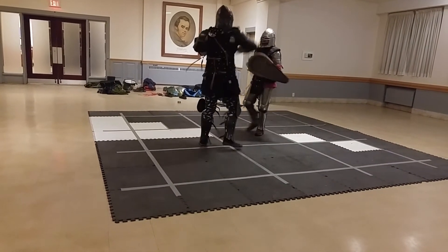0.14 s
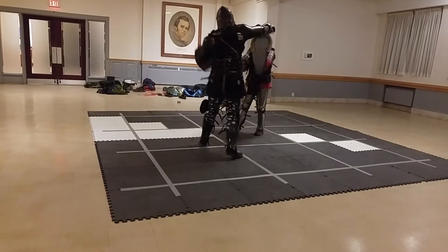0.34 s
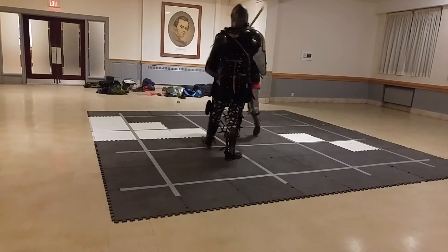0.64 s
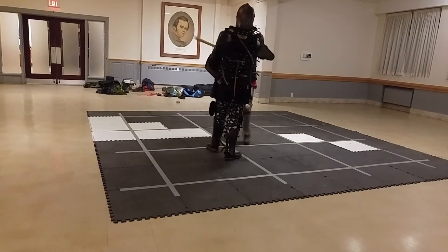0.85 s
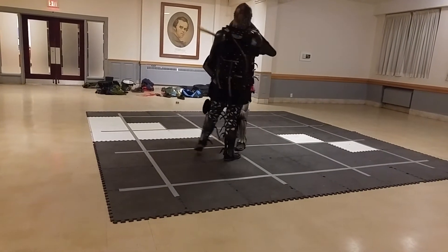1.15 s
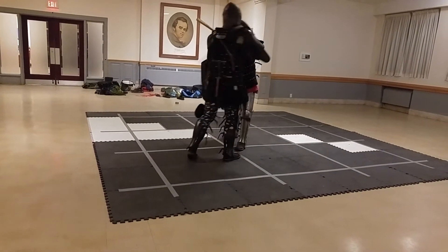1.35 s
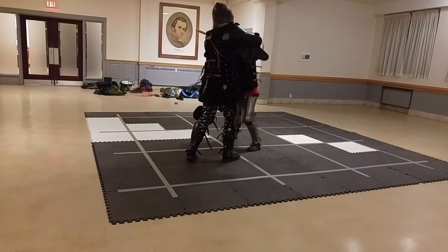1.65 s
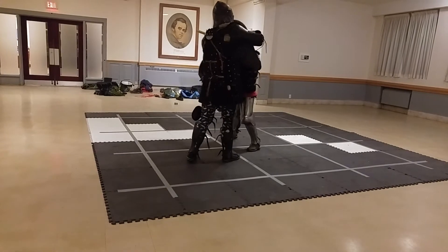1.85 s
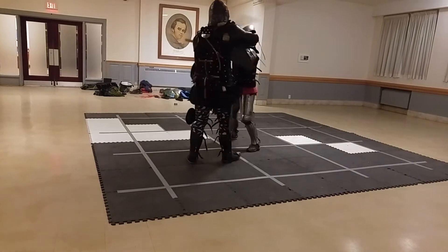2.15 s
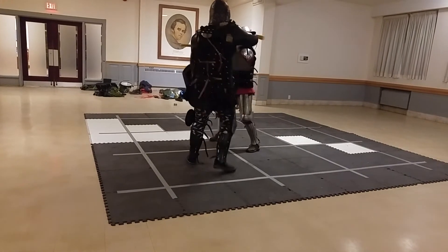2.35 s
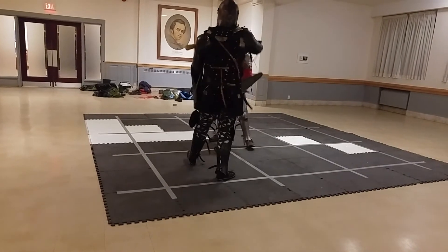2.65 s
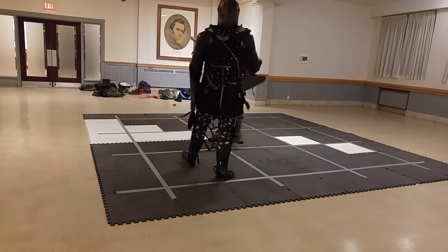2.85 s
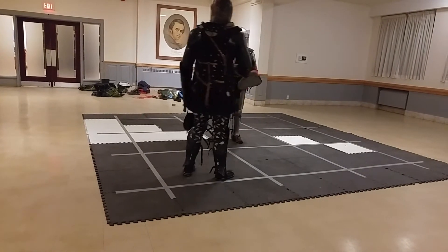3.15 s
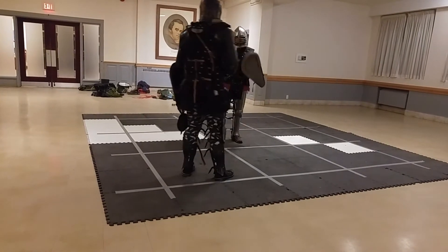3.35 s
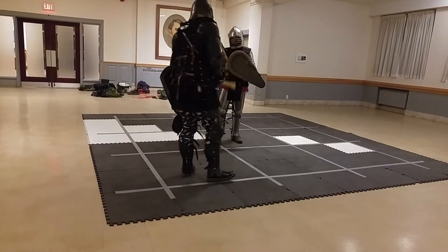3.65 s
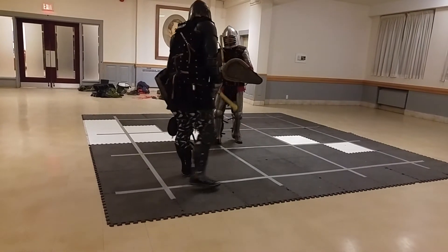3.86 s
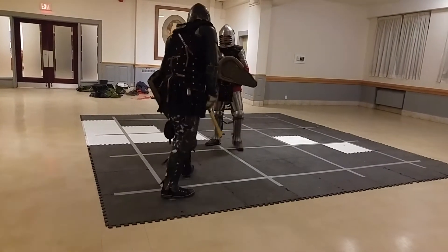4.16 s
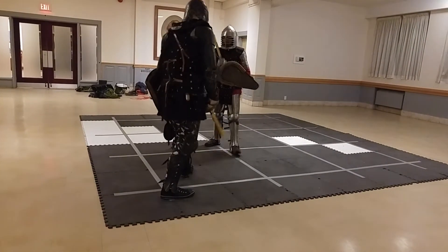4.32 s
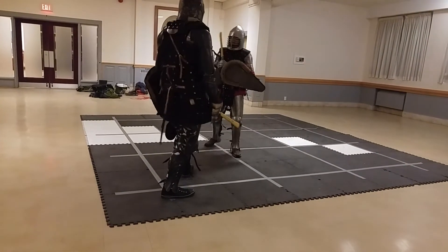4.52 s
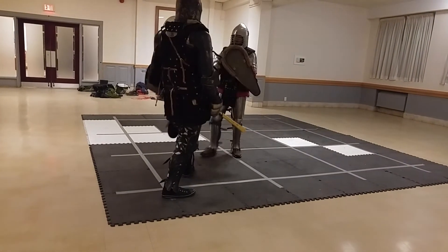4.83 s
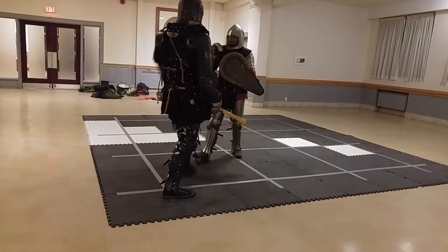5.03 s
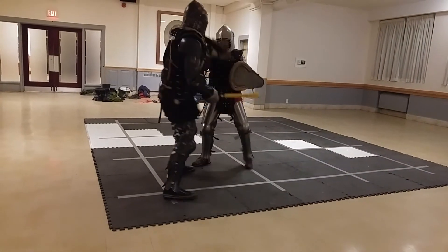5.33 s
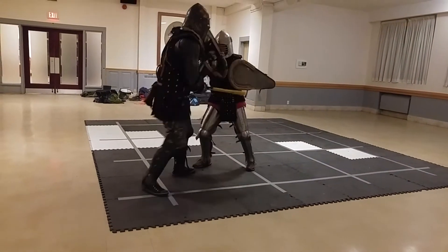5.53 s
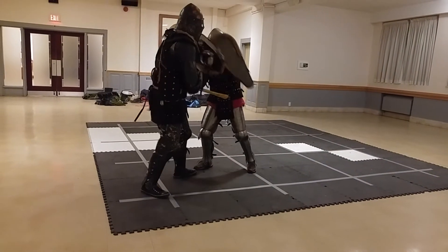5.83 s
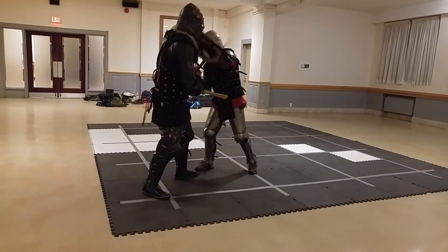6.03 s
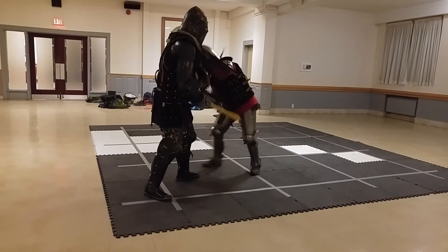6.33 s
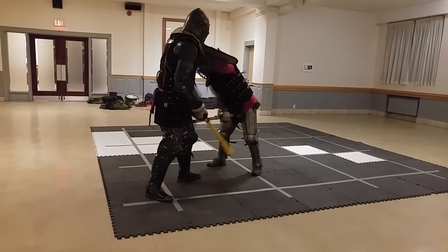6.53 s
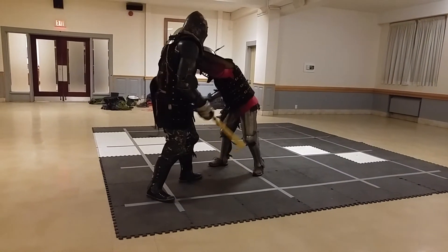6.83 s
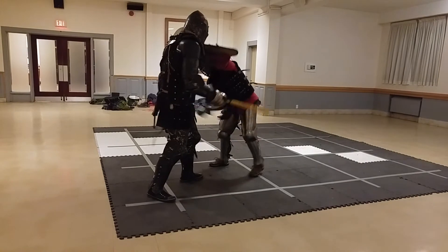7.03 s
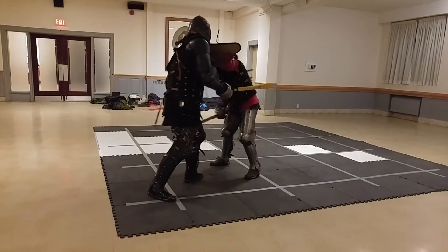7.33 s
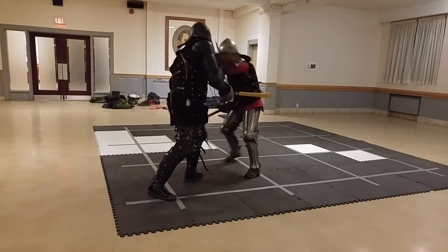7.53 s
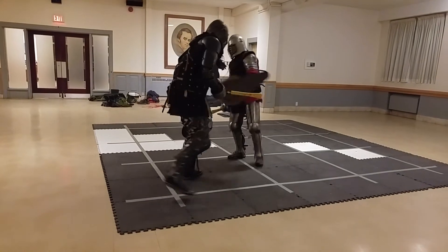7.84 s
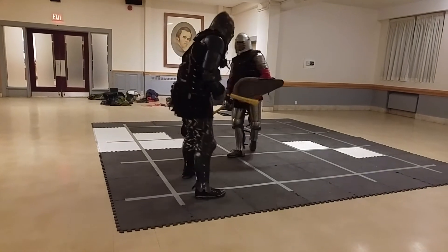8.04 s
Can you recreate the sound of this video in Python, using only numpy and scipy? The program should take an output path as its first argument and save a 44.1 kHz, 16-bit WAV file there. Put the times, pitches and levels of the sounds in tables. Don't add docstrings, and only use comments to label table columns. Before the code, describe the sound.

Two fighters in steel plate spar in a hard, echoing hall, heard from a few metres by a small stereo microphone. From 0.2 seconds, sharp clanks and booming shield blows come fast; at about 0.75 a helmet rings clearly, and heavy strikes follow at 1.0 and 1.4-1.5. A short, sharp crash of the whole harness lands at 2.15, then clanks at 2.65 and 3.2. Mail jingles and feet shuffle throughout. From 3.4 to 5 seconds only light plate and strap ticks remain, thickening near 4.2. At 5.2 a dense flurry of clanks and slapping plates begins, building to a long rattling crash with a deep thud at 6.5. After a brief lull, a bright, violent blow and heel stamp hit at 7.14, overloading the microphone. Jingling swells around 7.45, and final clanks at 7.8 and 7.95 ring into the hall's bright tail.

```python
import sys
import numpy as np
from scipy import signal
from scipy.fft import rfft, irfft, next_fast_len
from scipy.io import wavfile
from scipy.ndimage import uniform_filter1d

SR = 44100
rng = np.random.default_rng(int(sys.argv[2]) if len(sys.argv) > 2 else 0)


def gain_from_decibels(decibels):
    exponent = np.asarray(decibels, float) / 20
    return 10 ** exponent


def persist_wave(psi):
    counts = np.round(np.clip(psi, -1, 1) * 32767).astype(np.int16)
    wavfile.write(sys.argv[1], SR, np.atleast_2d(counts).T)


N = 360738

# start in seconds, peak in dB, boom in Hz, knock share in dB.
BLOWS = [(.04, -21, 430, -3), (.308, -4.5, 349, -4), (.334, -18.5, 290, -15), (.73, -6, 349, -4),
         (.764, -11.5, 379, -29), (1.028, -8, 423, -5), (1.422, -2.5, 250, -3.5), (1.459, -13.5, 320, -16),
         (1.493, -6, 356, 1), (2.008, -21, 352, 17), (2.152, -9, 314, -6.5), (2.289, -29, 262, -1.5),
         (2.656, -11, 288, 1), (3.157, -20.5, 350, 7.5), (3.611, -26.5, 352, -7), (4.103, -28, 380, 6),
         (4.129, -23.5, 337, -1), (4.775, -32, 330, 15), (5.3, -11.5, 380, -15), (5.329, -14.5, 260, -24),
         (5.65, -21.5, 345, 13), (5.84, -29, 380, -12), (6.062, -20, 262, -19), (6.501, -5.5, 250, -16),
         (6.515, -5.5, 431, -28), (6.559, -19, 424, -15), (7.143, -3.5, 436, -1.5), (7.696, -20.5, 362, 12),
         (7.816, -42, 457, 17), (7.953, -21.5, 268, -2)]
# start in seconds, rms in dB, shaking time in seconds,
# decay in seconds, treble tilt in dB.
HARNESS_BLOWS = [
    (2.1455, -12, 0.047, 0.016, -2),
    (6.5, -12.5, 0.084, 0.12, -1.5),
    (7.142, -11, 0.053, 0.079, 4.5),
    (5.297, -20.5, 0.26, .04, 1),
]
# frequency in Hz, density in dB per Hz.
STEEL_SPECTRUM = [(650, -11), (1100, -11.5), (1500, -5), (2500, -3.5), (4000, -1), (6000, 0.5), (9000, -4),
                  (11000, -10.5), (15500, -23)]
# frequency in Hz, density in dB per Hz.
PADDING_SPECTRUM = [(24, -50), (40, -14.5), (102, -7), (196, -3.5), (336, -2), (428, -8), (518, -3.5),
                    (671, 0), (999, -4.5), (2500, -14), (3250, -17.5), (5500, -120)]


def rms_one(x):
    return x / np.sqrt(np.mean(x ** 2) + 1e-20)


def at_hz(points, hz, column=1):
    points = np.array(points)
    return np.interp(np.log(hz + 1), np.log(points[:, 0]), points[:, column])


def colour(x, spectrum):
    size = next_fast_len(x.shape[-1])
    hz = np.arange(size // 2 + 1) * SR / size
    return irfft(rfft(x, size) * gain_from_decibels(at_hz(spectrum, hz)), size)[..., :x.shape[-1]]


def rings(hz, level_db, t60_s, length_s, phase=0):
    t = np.arange(int(length_s * SR))[:, None] / SR
    return (gain_from_decibels(level_db - 60 * t / t60_s) * np.sin(2 * np.pi * (hz * t + phase))).sum(axis=1)


def add(out, start_s, peak_db, sound, pan_db=0.):
    i = round(start_s * SR)
    sound = sound[:N - i] * gain_from_decibels(peak_db) / np.abs(sound).max()
    out[:, i:i + len(sound)] += sound * gain_from_decibels(np.array([[.5], [-.5]]) * pan_db)


def grains(size, per_s, spread_db):
    strength = gain_from_decibels(spread_db * np.minimum(rng.exponential(1, size), 4)) * rng.choice([-1, 1], size)
    return strength * (rng.random(size) < per_s / SR)


def aftermath(blows, gain_db, peak_s):
    t = np.arange(N) / SR
    power = np.zeros(N)
    for start_s, blow_db, *_ in blows:
        u = np.maximum(t - start_s, 0) / peak_s
        power += (gain_from_decibels(blow_db + gain_db) * u * np.exp(1 - u)) ** 2
    return power


def motion():
    # time in seconds, jingle level in dB.
    effort_points = [(0, -29.5), (.41, -24), (.7, -26), (.98, -22.5), (1.25, -29.5), (1.59, -25.5),
                     (3.1, -33), (3.9, -42.5), (4.26, -32), (4.5, -40.5), (4.76, -34.5), (5.0, -38),
                     (5.4, -27.5), (6.4, -27.5), (6.9, -39), (7.45, -22.5), (7.78, -36), (8.18, -31.5)]
    t = np.arange(N) / SR
    effort_db = np.interp(t, *np.transpose(effort_points))
    clump = np.interp(t, np.linspace(0, N / SR, 200), rng.standard_normal(200))
    near, far = (grains(N, 1200 * gain_from_decibels(4.0 * clump), spread_db=1.0) for fighter in range(2))
    ticks = np.array([near + 0.082 * far, far + 0.073 * near])
    one, other = (grains(N, 200, spread_db=0.5) for fighter in range(2))
    feet = np.array([one + 0.82 * other, other + 0.65 * one])
    swing_power = aftermath(HARNESS_BLOWS, gain_db=-16.5, peak_s=0.067)
    stagger_power = aftermath(BLOWS, gain_db=-24.5, peak_s=0.051)
    jingle = np.sqrt(gain_from_decibels(effort_db - 6) ** 2 + swing_power)
    shuffle = np.sqrt(gain_from_decibels(-40 + effort_db + 30) ** 2 + stagger_power)
    mail = rms_one(colour(ticks, STEEL_SPECTRUM)) * jingle
    return mail + rms_one(colour(feet, PADDING_SPECTRUM)) * shuffle


def stamps():
    # start in seconds, peak in dB, floor boom in Hz.
    heel_stamps = [(0.039, -33, 143), (0.302, -28, 140), (0.445, -38, 147), (0.728, -28, 91.5),
                   (0.966, -29, 143), (1.414, -27, 151), (2.15, -21, 104), (2.302, -34, 128),
                   (2.653, -52, 103), (5.346, -30, 113), (6.089, -25, 129), (6.495, -25, 116),
                   (7.145, -18.5, 147), (7.203, -31.5, 150), (7.373, -28.5, 139), (7.96, -49, 85.5)]
    out, t = np.zeros((2, N)), np.arange(SR // 4) / SR
    for start_s, peak_db, boom_hz in heel_stamps:
        boom = rings(boom_hz * np.array([1, 1.3]), np.array([0, -5]), t60_s=0.12, length_s=.25)
        add(out, start_s, peak_db + 1.0, boom * np.minimum(t / 0.0058, 1))
    return out


def thuds():
    # frequency in Hz, level in dB, share of the boom's t60.
    board_modes = [(614.5, 7.5, 0.37), (763, 8, 0.38), (889, 5.5, 0.38), (1140, -1.5, 0.4)]
    boom_cycles = 21.6
    out = np.zeros((2, N))
    board_hz, board_db, t60_share = np.transpose(board_modes)
    t = np.arange(SR // 5) / SR
    for start_s, peak_db, boom_hz, knock_db in BLOWS:
        t60_s = boom_cycles / boom_hz
        boom = rings(boom_hz * np.array([.6, 1, 1.35]), np.array([-9, 0, -6]), t60_s, .2)
        detune, uneven = rng.standard_normal((2, 4))
        knock_hz = board_hz * (1 + 0.052 * detune)
        knock = rings(knock_hz, board_db + 3 * uneven + knock_db, t60_s * t60_share, .2)
        dull = colour(rng.standard_normal(len(t)), [(90, -12), (200, -6.5)])
        puff = rms_one(colour(dull, PADDING_SPECTRUM)) * gain_from_decibels(-4.5 - 40 * t / t60_s)
        add(out, start_s, peak_db + 2.5, (boom + knock + puff) * np.minimum(t / 0.0022, 1))
    return out


def contacts():
    # start in seconds, peak in dB, main ring in Hz, treble share in dB,
    # rattle length in seconds.
    plate_knocks = [(.2396, -2.5, 5930, -7, 0.016), (.314, -6, 1540, -13.5, 0.021),
                    (7.121, -13, 5600, -10, 0.023), (.736, -5.5, 1690, -16, 0.024),
                    (.7634, -1.5, 3110, -16.5, 0.017), (.8055, -5, 3967, -18, 0.01),
                    (1.0294, 0, 5000, -7, 0.04), (1.429, -3.5, 6790, -12.5, 0.049),
                    (1.537, 1, 6230, -9, 0.023), (2.01, -4.5, 6330, -9.5, 0.066),
                    (2.6597, -5.5, 4930, -9.5, 0.043), (3.159, -6, 6160, -11, 0.041),
                    (3.2713, -6.5, 5130, -11.5, 0.079), (5.1818, -2.5, 2750, -9.5, 0.019),
                    (5.249, -4, 5460, -8, 0.0094), (5.324, -5, 3400, -2, 0.015),
                    (5.4735, -1, 2585, -3, 0.022), (5.696, -3.5, 5460, -10, 0.016),
                    (5.711, -4, 4740, -12, 0.027), (5.781, -0.5, 5520, 6.5, 0.0094),
                    (6.0335, -0.5, 6830, -5.5, 0.03), (6.3555, -3.5, 6300, -13, 0.11),
                    (7.82, -2.5, 6060, -9, 0.041), (7.9533, -3, 5750, -10.5, 0.072)]
    # start in seconds, peak in dB, ring in Hz,
    # treble share in dB.
    more_knocks = [(0.2952, -8.5, 5400, -8), (0.3215, -4.5, 5870, -11), (0.6528, -10, 9210, -10),
                   (0.9574, -10.5, 3960, -14), (1.0527, -9, 8860, -12.5), (1.172, -18, 6620, -16),
                   (1.4937, -8.5, 1350, -7), (1.507, -7, 9170, -15), (1.7587, -9, 8140, -7),
                   (1.8923, -9.5, 6230, -19), (2.3079, -9.5, 6450, -21), (2.7155, -11, 6600, -10),
                   (2.9337, -13, 5430, -8), (2.966, -11, 8320, -11), (5.2979, -3.5, 5210, -4),
                   (5.3722, -8.5, 8540, -5), (5.4008, -3, 6930, -7), (5.6082, -9, 5260, -9),
                   (5.6544, -7, 8430, -9), (5.8245, -14, 8820, -6), (5.8557, -6.5, 8210, -8),
                   (5.9958, -14.5, 8400, -6), (6.0881, -5, 6050, -6), (6.259, -8, 5210, -9),
                   (6.2946, -14, 4800, -12), (6.393, -10, 6050, -12), (6.4185, -5, 5380, -9),
                   (6.8388, -15, 1660, -11), (7.6972, -14, 1770, -10), (7.738, -14, 5700, -1)]
    # start in seconds, peak in dB, ring in Hz,
    # treble share in dB.
    strap_ticks = [(0.1565, -31, 7100, -10), (1.6576, -15, 6400, -7), (2.2682, -11, 8910, -12),
                   (3.4284, -27, 3650, -8), (3.5552, -22.5, 5950, -8), (3.5997, -15, 9300, -10),
                   (3.684, -20.5, 5160, -9), (3.7734, -25, 9370, -10), (3.8087, -26, 8380, -5),
                   (4.021, -22.5, 5050, -5), (4.0746, -22.5, 8540, -8), (4.1067, -16, 8480, -8),
                   (4.132, -13.5, 1380, -9), (4.1494, -18, 5100, -10), (4.1818, -18.5, 9400, -13),
                   (4.2338, -11.5, 9160, -12), (4.2687, -13, 5000, -9), (4.2773, -7.5, 5770, -10),
                   (4.4944, -34, 6100, -1), (4.5725, -19, 8310, -13), (4.6059, -13, 5370, -8),
                   (4.677, -13, 7330, -12), (4.7306, -9, 4500, -13), (4.7912, -15, 6480, -15),
                   (4.917, -32, 5070, 2), (5.1572, -23, 9330, -10), (6.947, -33, 1340, -10),
                   (7.056, -25, 5080, -5), (7.0704, -23, 9300, -6)]
    knock_rattle_s, tick_s = 0.026, 0.035
    strike_hz = 5940
    rows = plate_knocks + [(*row, knock_rattle_s) for row in more_knocks] + [(*row, tick_s) for row in strap_ticks]
    for start_s, rms_db, *_ in HARNESS_BLOWS[:3]:
        rows.append((start_s + 0.00077, rms_db + 21, strike_hz, -1, knock_rattle_s))
        rows.append((start_s + 0.072, rms_db + 9.5, strike_hz, -12, knock_rattle_s))
    return rows


def clanks():
    favour_db, favour_ratio = 3, 1.51
    pan_db, pan_spread_db = 1, 6.5
    out, size = np.zeros((2, N)), SR // 6
    t = np.arange(size) / SR
    for start_s, peak_db, main_hz, treble_db, rattle_s in contacts():
        pitch, weakness, damping, phase = rng.random((4, 32))
        hz = np.append(1300 * 11 ** pitch, main_hz)
        level_db = np.append(at_hz(STEEL_SPECTRUM, hz[:-1]) - 16 * weakness, 1.5)
        t60_s = np.append(.015 + .03 * damping, .035)
        plate = rings(hz, level_db, t60_s, .06, np.append(phase, 0))
        favour = [(main_hz / favour_ratio, 0), (main_hz, favour_db), (main_hz * favour_ratio, 0)]
        rattle = colour(colour(grains(size, 2800, spread_db=2.0), STEEL_SPECTRUM), favour)
        sound = rattle * gain_from_decibels(-20 * t / np.clip(rattle_s, .003, .1)) / np.abs(rattle).max()
        sound[:len(plate)] += plate / np.abs(plate).max() * gain_from_decibels(-4)
        tilt = [(1000, 0), (6000, 0), (8500, treble_db + 13.0), (16000, treble_db + 17.0)]
        sound = colour(sound * np.minimum(t / 0.0051, 1), tilt)
        add(out, start_s, peak_db - 2.5, sound, pan_db + pan_spread_db * rng.standard_normal())
    return out


def helm():
    # frequency in Hz, level in dB, t60 in seconds.
    helm_modes = [(3198, 1, .1), (3120, -3, .06), (3505, -4, .07), (4000, -4, .115), (4320, -5, .05),
                  (4500, -4, .06), (4640, -5, .06), (3760, -6, .05), (3340, -5, .05)]
    # start in seconds, peak in dB.
    helm_blows = [
        (.7635, -6),
        (.771, -6),
        (.792, -15),
        (.804, -13),
    ]
    out = np.zeros((2, N))
    for start_s, peak_db in helm_blows:
        add(out, start_s, peak_db, rings(*np.transpose(helm_modes), length_s=.3))
    return out


def crashes():
    out, size = np.zeros((2, N)), SR // 3
    t = np.arange(size) / SR
    for start_s, rms_db, hold_s, die_s, tilt_db in HARNESS_BLOWS:
        both, left, right = (grains(size, 14000, spread_db=2.0) for part in range(3))
        clash = colour(np.array([both + left, both + right]), STEEL_SPECTRUM)
        clash = colour(clash, [(2000, -tilt_db), (14000, tilt_db)])
        fade_db = -20 * np.maximum(t - hold_s, 0) / (3 * die_s) - 81 * t
        shape = np.minimum(t / 0.00048, 1) * gain_from_decibels(fade_db)
        i = round(start_s * SR)
        out[:, i:i + size] += rms_one(clash) * shape * gain_from_decibels(rms_db)
    return out


def hall(x):
    # frequency in Hz, t60 in seconds, level in dB.
    tail_bands = [(60.4, 0.22, 9), (250, 1.25, 0.5), (380, 0.65, 4), (540, 1.4, 2.5), (700, 1.7, 3),
                  (1900, 2.5, 1), (4830, 0.79, 1.5), (8300, 0.43, 4), (14100, 0.3, -4)]
    # delay in seconds, level in dB.
    wall_echoes = [(.0026, -11.5), (.0095, -10), (.017, -6.5), (.043, -10.5), (.052, -11)]
    # frequency in Hz, left-right likeness as a ratio.
    likeness_points = [(60, 1), (150, 1), (380, 0.89), (950, 0.28), (2380, -1.3), (5980, -0.23),
                       (15000, -0.13)]
    hall_db, build_s = -1.5, 0.012
    places = 8
    size = 3 * SR // 2
    t = np.arange(size) / SR
    tail, edges_hz = np.zeros((places, 2, size)), 40 * 2 ** np.arange(0, 9., .5)
    white = rng.standard_normal((2, 2, size))
    for k, (low, high) in enumerate(zip(edges_hz, edges_hz[1:])):
        bandpass = signal.butter(2, [low, high], "band", fs=SR, output="sos")
        mid, side = signal.sosfilt(bandpass, white[k % 2])
        hz = np.sqrt(low * high)
        alike = np.clip(at_hz(likeness_points, hz), 0, 1)
        t60_s = max(at_hz(tail_bands, hz), .1)
        fade = gain_from_decibels(at_hz(tail_bands, hz, column=2) - 60 * t / t60_s) / np.sqrt(t60_s)
        band = np.sqrt(1 + alike) * mid + np.sqrt(1 - alike) * side * [[1], [-1]]
        for place in range(places):
            tail[place] += fade * np.roll(band, place * size // places, axis=1)
    tail *= (1 - np.exp(-t / build_s)) * gain_from_decibels(hall_db) * 3 / np.sqrt(SR)
    for k, (delay_s, echo_db) in enumerate(wall_echoes):
        i = round(delay_s * SR)
        tail[:, k % 2, i] += gain_from_decibels(echo_db)
        tail[:, 1 - k % 2, i + 17] += gain_from_decibels(echo_db - 7.0)
    out, stay = np.zeros((2, N + 2 * size)), N // places + 1
    for place in range(places):
        i = place * stay
        answer = signal.fftconvolve(x[None, i:i + stay], tail[place], axes=1)
        out[:, i:i + answer.shape[1]] += answer
    return out[:, :N]


def scene():
    # frequency in Hz, level in dB.
    room_spectrum = [(25, -42), (60, -58), (150, -68), (700, -65), (3000, -64), (9000, -68), (12000, -80),
                     (16000, -90)]
    dry = motion() + stamps() + thuds() + clanks() + helm() + crashes()
    dry[1] = np.roll(dry[1], 1)
    room = colour(rng.standard_normal((2, N)), room_spectrum) * gain_from_decibels(-10)
    return dry + hall(dry.mean(axis=0)) + room


def roll_off(x):
    return signal.sosfilt(signal.butter(12, 15780, fs=SR, output="sos"), x)


def record(dry):
    # frequency in Hz, left gain in dB, right gain in dB.
    port_gains = [(60, -0.5, -1), (960, 1.26, 0.84), (2260, -1.65, -0.2), (3440, 2.34, 1.95),
                  (4500, 1.5, 5.5), (5800, -4.5, 8), (7540, 0.5, 5.5), (7760, -0.5, -10), (8200, 9, 1.5),
                  (8820, 6.5, 10), (9600, -3.5, 11.5), (9900, 8, -3.5), (11900, 6.5, 1), (15200, 5, -39)]
    left_cut_hz, right_cut_hz = 90, 55
    x = np.array([signal.sosfilt(signal.butter(2, cut_hz, "high", fs=SR, output="sos"), port)
                  for cut_hz, port in zip((left_cut_hz, right_cut_hz), dry)])
    dip_hz, dip_width_hz, dip_db = 515, 90, -9
    peak = signal.iirpeak(dip_hz, dip_hz / dip_width_hz, fs=SR)
    x = x + (gain_from_decibels(dip_db) - 1) * signal.lfilter(*peak, x)
    gains = np.array(port_gains)
    x = np.array([colour(x[0], gains[:, [0, 1]]), colour(x[1], gains[:, [0, 2]])])
    excess = uniform_filter1d(np.clip(np.abs(x) - .75, 0, .3), size=900, axis=1)
    sag_hz, sag_db = 55, np.array([[-10], [-11.5]])
    sag_band = signal.butter(1, [sag_hz / 3, sag_hz], "band", fs=SR, output="sos")
    sag = signal.sosfilt(sag_band, excess ** 2)
    x = x + sag * gain_from_decibels(sag_db + 48.5) * [[-1], [1]]
    x = np.clip(1.12 * np.tanh(x / 1.12), -1, 1)
    top_hz = 15950
    x = signal.sosfilt(signal.cheby2(14, 40, top_hz, fs=SR, output="sos"), x)
    return roll_off(x)


dry = scene()
out = record(dry)
persist_wave(out)
```